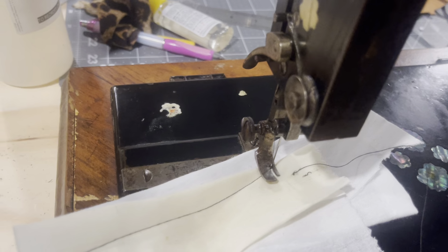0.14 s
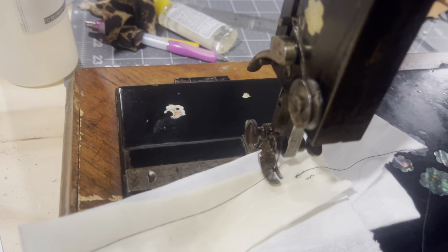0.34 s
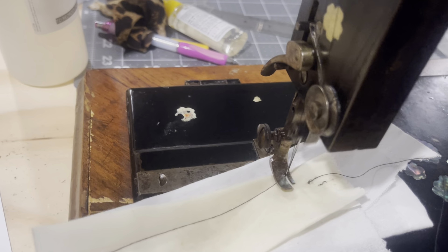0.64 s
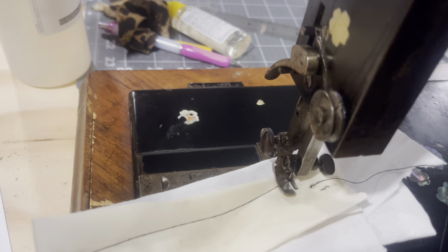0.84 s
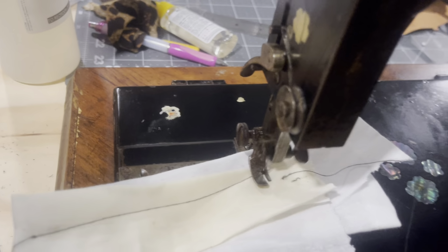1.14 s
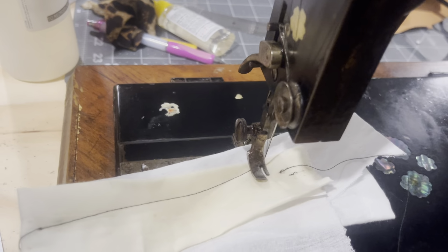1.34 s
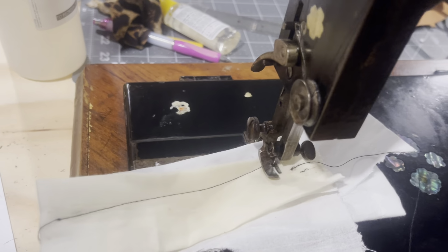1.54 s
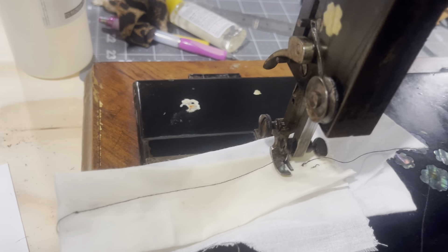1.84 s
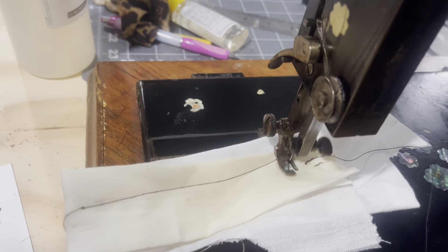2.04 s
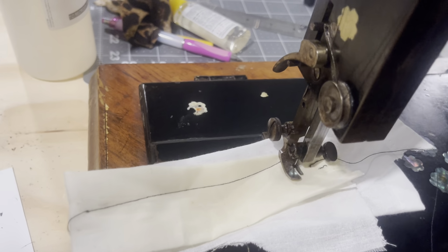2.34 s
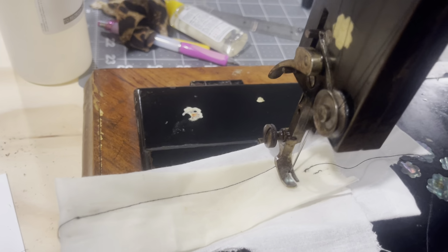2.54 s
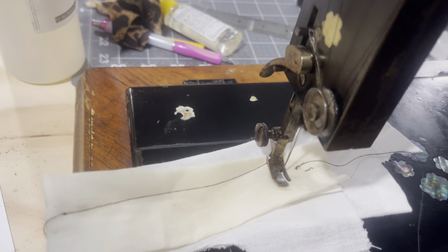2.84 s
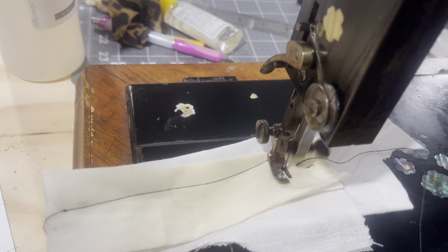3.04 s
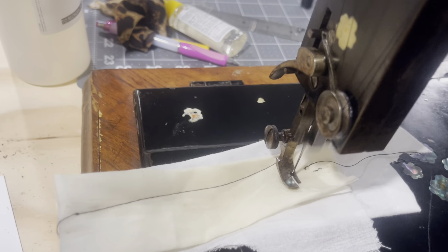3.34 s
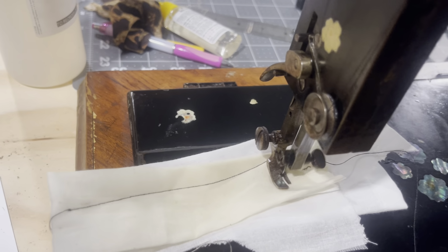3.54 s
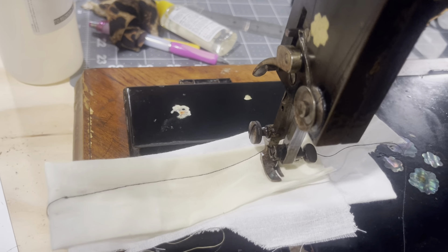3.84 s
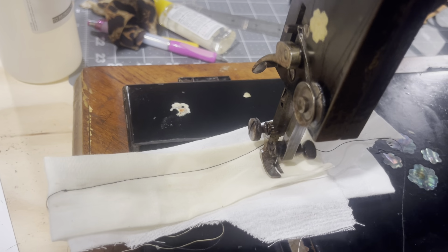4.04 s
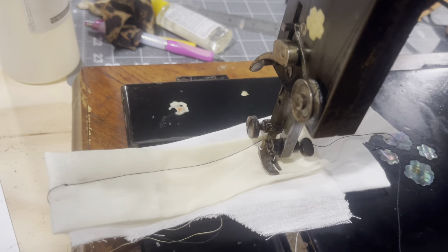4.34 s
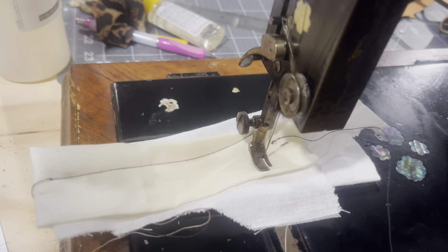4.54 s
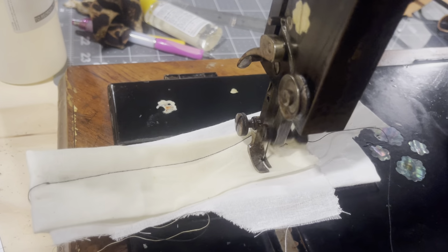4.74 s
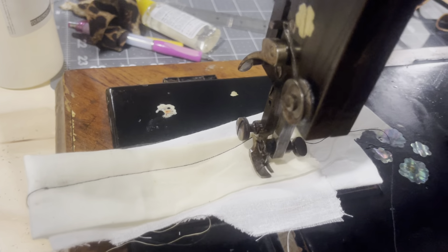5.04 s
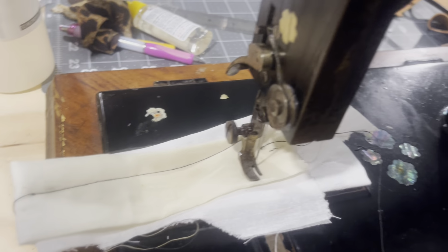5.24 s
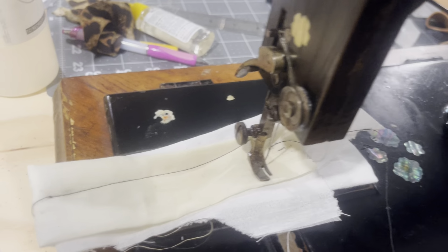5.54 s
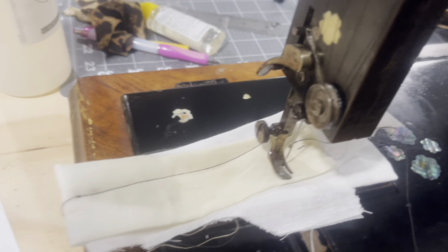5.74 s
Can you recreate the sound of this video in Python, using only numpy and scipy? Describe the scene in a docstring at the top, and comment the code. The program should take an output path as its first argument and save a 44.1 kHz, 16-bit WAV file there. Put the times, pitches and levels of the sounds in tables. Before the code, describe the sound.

Close stereo pickup indoors, with little echo. Hands knock a wooden cabinet, loose steel jangles briefly, and a vintage sewing machine starts a bit unevenly. It settles into fast, regular clicking and clacking over a woody rumble, with slight thread hiss and a faint wheel moan coming and going. After about five seconds it slows, knocks once clearly, and leaves a quiet room hum.

```python
"""In a small room, close by, an old cast-iron sewing machine on a wooden cabinet sews sixteen stitches.
Noise-like knocks and ringing modes hit the cabinet, then the drive rumbles up as streams of tiny contacts.
In every turn the needle goes down, the shuttle and thread snap against steel, loose joints tap,
the feed clacks and a spring ticks: short bursts of coloured noise or brief damped tones.
The wheel moans where it rubs, then runs out over a quiet room hum of noise and faint tones."""
import sys
import numpy as np
from scipy import signal
from scipy.fft import rfft, irfft, next_fast_len
from scipy.io import wavfile
from scipy.ndimage import uniform_filter1d, map_coordinates

SR = 44100
rng = np.random.default_rng(int(sys.argv[2]) if len(sys.argv) > 2 else 0)


def file_out(sig):
    """Save sig as 16-bit WAV at sys.argv[1]."""
    # one column per channel
    cols = np.atleast_2d(sig).T
    # limit, then scale
    lim = np.clip(cols, -1, 1)
    pcm = np.round(lim * 32767).astype(np.int16)
    wavfile.write(sys.argv[1], SR, pcm)


N = 259749  # length of the scene in samples


def amp(db):
    """Turn decibels into a plain multiplier."""
    return 10 ** (np.asarray(db) / 20)


def unit(x):
    """Scale a sound to an rms of 1."""
    return x / np.sqrt(np.mean(x ** 2) + 1e-20)


def along(points, hz):
    """Read a curve of (frequency, value) points on a log frequency axis."""
    f, v = np.transpose(points)
    return np.interp(np.log(hz + 1), np.log(f + 1), v)


def clock(length=N):
    """Seconds, sample by sample."""
    return np.arange(length) / SR


def wobble(rate):
    """A smooth random curve through `rate` random points a second."""
    return map_coordinates(rng.standard_normal(N // 20), [clock() * rate], mode="wrap")


def filtered(x, response):
    """Filter x by a response given as a function of frequency."""
    m = next_fast_len(x.shape[-1] + SR // 4)
    spectrum = rfft(x, m) * response(np.fft.rfftfreq(m, 1 / SR))
    return irfft(spectrum, m)[..., :x.shape[-1]]


def coloured(x, colour):
    """Filter x by a table of levels over frequency."""
    return filtered(x, lambda hz: amp(along(colour, hz)))


def causal(colour, hz):
    """Minimum-phase response of a colour: it rings only after the blow."""
    cepstrum = irfft(np.log(amp(along(colour, hz))))
    half = len(cepstrum) // 2
    # fold the second half onto the first, so nothing comes before the blow
    return np.exp(rfft(np.r_[cepstrum[0], 2 * cepstrum[1:half], np.zeros(half)]))


# How alike the left and right sides are: pitch_hz, likeness (1 = the same)
LIKENESS = [(60, 1), (250, 0.81), (600, 0.92), (1200, 0.34), (2500, 0.54), (7000, 0.63), (12000, 0.78)]


def spread(pair):
    """Mix two unrelated signals into left and right, partly alike at each frequency."""
    def mid_and_side(hz):
        mix_angle = np.arccos(np.clip(along(LIKENESS, hz), -1, 1)) / 2
        return np.array([np.cos(mix_angle), np.sin(mix_angle)])

    mid, side = filtered(pair, mid_and_side)
    return np.array([mid + side, mid - side])


def rush(colour):
    """Two coloured noises that share an rms of 1."""
    return unit(coloured(rng.standard_normal((2, N)), colour))


def steadied(x, span):
    """Even out the strength over span seconds, as a flywheel does for the drive."""
    power = uniform_filter1d(x[0] ** 2, max(int(span * SR), 1))
    return unit(x / np.sqrt(np.abs(power) + np.mean(power) / 20))


def add(track, s, sound):
    """Lay a sound into a track at s seconds."""
    part = track[..., max(round(s * SR), 0):][..., :sound.shape[-1]]
    part += sound[..., :part.shape[-1]]


def chatter(rate, bed, t60, count=4):
    """Tiny contacts of uneven size in several parts, each briefly ringing, on a bed of rolling noise."""
    t = clock(SR // 20)
    parts = rng.standard_normal((count, 2, len(t))) * amp(-60 * t / t60)
    contacts = (rng.random((count, 1, N)) < rate / count / SR) * rng.standard_normal(N)
    rung = signal.oaconvolve(contacts, parts, axes=-1).sum(axis=0)[:, :N]
    return unit(rung) + bed * rng.standard_normal((2, N))


def strikes(events, colour, t60, ring_db, ring_t60):
    """Each contact is a short burst in a part's crowded resonances, with a weaker, longer ring."""
    t, track = clock(SR // 5), np.zeros((2, N))
    decay = amp(-60 * t / t60) + amp(ring_db - 60 * t / ring_t60)
    shape = decay * (1 - np.exp(-t / 0.00021))  # soft onset
    size = 16384
    hz = np.fft.rfftfreq(size, 1 / SR)
    for s, db in events:
        # no two contacts land on quite the same spot, so each has its own colour
        tint = [(f, level + rng.normal(0, 2)) for f, level in colour]
        noise = rng.standard_normal((2, len(t))) * shape
        burst = irfft(rfft(noise, size) * causal(tint, hz))
        burst = burst / np.linalg.norm(burst, axis=1, keepdims=True)
        add(track, s, amp(db) * burst)
    return track


def ring(modes, attack):
    """Damped modes after one blow, at slightly new strengths."""
    t, tones = clock(SR // 2), 0
    for hz, db, t60 in modes:
        tones = tones + amp(db + rng.normal() - 60 * t / t60) * np.sin(2 * np.pi * hz * t)
    return tones * (1 - np.exp(-t / attack))


# The room's quiet air noise: pitch_hz, level_db (relative)
AIR_COLOUR = [(15, -34), (25, -15.5), (114, 0), (600, -11.5), (1200, -18.5), (2110, -28.5), (3340, -20),
              (4370, -32), (4740, -26.5), (9320, -30.5), (16000, -56.5)]
# Faint electrical tones: pitch_hz, level_db (rms)
HUM_TONES = [(3359, -90), (4705, -92), (9410, -107)]


def background():
    """Room air, a low drone of changing strength, a thin hiss and faint electrical tones."""
    tones = 0
    for hz, db in HUM_TONES:
        phase = 2 * np.pi * hz * clock() + 0.12 * wobble(21)
        tones = tones + amp(db) * np.sqrt(2) * np.sin(phase)
    drone_s = [0, .25, .4, .6, 5.1, 5.45, 5.56, 5.75]
    drone_db = [-88.5, -50, -68.5, -56.0, -55.5, -67.5, -72, -64.0]
    drone_colour = [(20, -40), (45, -16), (60, 5.5), (74, -11.5), (110, -1.0), (300, -127)]
    drone = amp(np.interp(clock(), drone_s, drone_db)) * steadied(rush(drone_colour), span=0.14)
    hiss_colour = [(2500, -35), (3100, -12), (3380, 5.0), (3700, 1.0),
                   (4300, -19), (4700, -4), (5200, -4), (9000, -48)]
    hiss = amp(-88.5) * rush(hiss_colour)
    return tones + spread(amp(-75) * rush(AIR_COLOUR) + drone + hiss)


# How long the room echoes: pitch_hz, fall_by_60_db_s
ROOM_DECAY = [(150, 0.36), (1500, 0.21), (6000, 0.2), (14000, 0.15)]


def room(x):
    """A small room's answer, each frequency dying at its own speed."""
    hz, t, z = signal.stft(rng.standard_normal((2, SR // 2)), SR, nperseg=256)
    fading = z * amp(-60 * t / along(ROOM_DECAY, hz)[:, None])
    tail = signal.istft(fading, SR, nperseg=256)[1]
    # the answer begins 5 ms late
    tail = np.pad(tail / np.linalg.norm(tail[0]), ((0, 0), (SR // 200, 0)))
    return signal.fftconvolve(x, tail, axes=1)[:, :N]


# Level difference at the two microphone ports: pitch_hz, left_minus_right_db
PORT_TILT = [(150, 2), (400, -2.5), (550, -6), (720, 9.5), (1100, -1), (3900, -2), (5200, 4.5),
             (6100, -0.5), (7100, 1), (8400, -5), (9600, -0.5)]
# Phase difference at the ports: pitch_hz, left_lead_rad
PORT_LEAD = [(0, 0), (600, 0.1), (950, -1.4), (2930, 1.0), (4390, 0.8), (5000, 2.7), (5510, 0.8),
             (6370, 0.3), (6980, 1.4), (8180, 7.2), (11600, 0.4), (12500, -0.4), (13400, -3.2),
             (14000, -3.1), (14900, -6.0), (16400, -6.3)]


def ports(hz):
    """Reflections favour one microphone port or the other, by frequency."""
    level = amp(np.outer([.5, -.5], along(PORT_TILT, hz)))
    return level * np.exp(1j * np.outer([.5, -.5], along(PORT_LEAD, hz)))


# One row a stitch: needle_down_s, needle_db, main_snap_delay_s, early_snap_db, main_snap_db,
# late_snap_db, thump_db, rod_swing_db (levels relative within each kind of sound)
STITCH_ROWS = [(0.597, -34, 0.017, -51, -29.5, -36, -40, -45.5),
               (0.9716, -31, 0.012, -51, -57, -24, -39, -47),
               (1.2912, -35, .016, -74, -30.5, -30.5, -48, -44),
               (1.5831, -29.5, 0.013, -43.5, -26.5, -38, -42.5, -40.5),
               (1.875, -29, 0.011, -36, -28, -49, -44.5, -38.5),
               (2.167, -29, .0175, -68, -38.5, -48, -44.5, -36),
               (2.4536, -29, 0.014, -31.5, -33, -31.5, -43.5, -43),
               (2.7552, -32, 0.014, -45, -30.5, -26.5, -47, -42),
               (3.0519, -31.5, 0.016, -49, -31, -37.5, -43, -35.5),
               (3.3244, -30.5, .0155, -50, -44, -33, -37.5, -35.5),
               (3.6068, -29, .0128, -41, -24.5, -33, -44, -38),
               (3.883, -29.5, 0.014, -46, -29, -31, -44, -34.5),
               (4.158, -34, 0.017, -41.5, -29.5, -34.5, -39.5, -46),
               (4.4614, -33.5, 0.014, -64, -58, -24.5, -43, -38.5),
               (4.749, -33, 0.014, -34, -29, -31, -40.5, -41.5),
               (5.081, -34, .009, -70, -27, -48, -45.5, -52)]
# ends of the turn count, set before the drive is heard and after it dies away
COUNT_FROM_S, COUNT_TO_S = .2, 5.7


def marks():
    """Times of the whole turns, one at each needle stroke, with the two ends of the turn count."""
    return np.r_[COUNT_FROM_S, np.transpose(STITCH_ROWS)[0], COUNT_TO_S]


def angle():
    """The turn count over time: the needle goes down at whole turns."""
    return np.interp(clock(), marks(), np.arange(len(marks())))


def each_turn(share):
    """For every stitch, the time at which the shaft stands a share of a turn past the needle."""
    return np.interp(np.arange(len(STITCH_ROWS)) + 1 + share, np.arange(len(marks())), marks())


# Levels within one turn: share_of_turn after the needle, rumble_db, bearing_rattle_db, thread_hiss_db
# (levels relative)
TURN_LEVELS = [(0, 5, -0.5, -50), (0.038, 4, 2.5, -44.5), (.15, 5.5, 1.5, -57), (.25, 0.5, 2, -63.5),
               (0.418, 2.5, 3, -60.5), (.52, -4.5, -8, -69.5), (.63, -1.5, -2, -69), (.75, 4, 0, -75.5),
               (.82, 3, 7, -60.5), (.9, 2, 3, -56.5), (0.978, 6, 1.5, -63.5)]


def turn():
    """Rumble, rattle and hiss levels as the shaft goes round."""
    share, *levels = np.transpose(TURN_LEVELS)
    return [np.interp(angle(), share, db, period=1) for db in levels]


WHEEL_TURN_S, WHEEL_BINDS_S = .855, 1.47  # about one round in three stitches; a time when it binds


def wheel_swell():
    """+1 where the drive wheel binds, once a round, and -1 where it runs free."""
    return np.cos(2 * np.pi * (clock() - WHEEL_BINDS_S) / WHEEL_TURN_S)


# The drive starts, falters once, runs steadily and runs out: time_s, level_db (before the wheel's swell)
DRIVE_LEVEL = [(0.4, -56.5), (0.48, -53.5), (0.6, -45.5), (0.78, -49.5), (0.96, -42.5), (2.3, -41.5),
               (3.3, -41), (4.45, -42), (4.92, -42), (5.2, -53.5), (5.29, -64), (5.5, -73)]


def effort():
    """The drive's level in dB, swelling by 1 dB with each turn of the wheel; near silent outside the table."""
    return np.interp(clock(), *np.transpose(DRIVE_LEVEL), left=-120, right=-120) + wheel_swell()


def fade_with_drive():
    """A multiplier that fades a sound out when the drive is weak."""
    return amp(np.minimum(effort() + 46, 0))


# Knocks on the cabinet: time_s, boom_db, panel_db, steel_ring_db (levels relative)
KNOCK_ROWS = [(0.052, -68, -55.5, -80), (0.106, -60, -35.5, -45.5), (0.116, -65, -37.5, -70),
              (0.162, -46.5, -51, -68), (0.185, -41, -43, -64), (0.24, -59, -57, -86),
              (0.272, -55.5, -56, -79), (0.439, -54, -44, -82), (5.133, -51, -31.5, -52),
              (5.228, -52.5, -41, -85), (5.398, -54.5, -51, -92), (5.688, -62.5, -57.5, -91),
              (5.781, -63.5, -58, -93)]
# Tones of the cabinet's box: pitch_hz, level_db (relative), fall_by_60_db_s
BOX_MODES = [(71.4, -5, 0.62), (136, 5.5, 0.073), (156.4, 3, 0.075)]
# Tones of its panel: pitch_hz, level_db (relative), fall_by_60_db_s
PANEL_MODES = [(268, -4, 0.087), (366, -8, 0.095), (420, 4.5, 0.043), (630, -9.5, 0.034)]
# Colour of loose steel: pitch_hz, level_db (relative)
STEEL_COLOUR = [(600, -7), (1350, -7), (1800, 0), (2100, 1), (2450, -18), (3100, -13.5), (6400, -19),
                (11000, -60)]


def knocks():
    """Hands and the wheel knock the cabinet: its box booms, a panel rings and loose steel jangles."""
    track = np.zeros(N)
    for s, boom_db, panel_db, _ in KNOCK_ROWS:
        boom = amp(boom_db) * ring(BOX_MODES, attack=0.0034)
        panel = amp(panel_db) * ring(PANEL_MODES, attack=0.0044)
        add(track, s, boom + panel)
    steel_hits = np.array(KNOCK_ROWS)[:, [0, -1]]
    steel = strikes(steel_hits, STEEL_COLOUR, t60=0.014, ring_db=-18, ring_t60=0.23)
    return track + amp(21) * spread(steel)


# Wood resonances of the cabinet: pitch_hz, width_hz, level_db (relative)
CABINET_MODES = [(85.2, 18, -9), (120.3, 28.7, -4.5), (164.6, 23, -2.5)]


def wood(hz):
    """The cabinet answers most strongly at a few resonances, in alternating sign."""
    response = 0
    for k, (centre, width, db) in enumerate(CABINET_MODES):
        damping = 1j * hz * width
        response = response + (-1) ** k * amp(db) * damping / (centre ** 2 - hz ** 2 + damping)
    return response


# Colour of the rumble: pitch_hz, level_db (relative)
RUMBLE_COLOUR = [(50, -76), (130, -16), (215, -4.5), (270, -1.5), (350, 1.5), (430, 1.5), (520, -6.5),
                 (610, -12.5), (790, -19), (1100, -37), (5000, -110)]
# Colour of the bearing rattle: pitch_hz, level_db (relative)
RATTLE_COLOUR = [(300, -31), (850, -5.5), (1040, 11), (1120, 3), (1220, 6), (1500, 2.5), (1900, -6),
                 (2200, -6.5), (2550, -24), (3000, -12), (6500, -25.5), (13000, -74)]


def drive():
    """Wheels and rods shake the cabinet; loose bearings rattle above."""
    rumble_db, rattle_db, _ = turn()
    body = steadied(filtered(chatter(rate=170, bed=0.99, t60=0.0016), wood), span=0.098)
    rumble = steadied(coloured(chatter(rate=70, bed=1.0, t60=0.053), RUMBLE_COLOUR), span=0.0547)
    rattle = coloured(chatter(rate=90, bed=0.75, t60=.014), RATTLE_COLOUR)
    rattle = unit(rattle * amp(1.8 * wobble(100)))  # uneven strength
    mix = amp(-7.0) * body + amp(rumble_db - 3.5) * rumble + amp(rattle_db - 15.0) * rattle
    return amp(effort()) * mix


def moan():
    """The wheel rubs about every third stitch; its note sways once with each turn of the shaft."""
    pitch_hz = 675 + 45 * np.cos(2 * np.pi * (angle() - .28))
    rough = wobble(60) + 1j * wobble(60)
    tone = np.real(rough * np.exp(2j * np.pi * np.cumsum(pitch_hz) / SR))
    return amp(effort() - 20 + 4 * wheel_swell()) * tone


def thumps():
    """Time and level of the shuttle's return in each stitch."""
    return list(zip(each_turn(-.205), np.transpose(STITCH_ROWS)[-2]))


# The rods reverse twice a turn: share_of_turn after the needle, level_db over the rod swing
ROD_REVERSALS = [(-.06, -1.5), (0.459, -3)]
ROD_HZ, THUMP_HZ = 172, 126.5  # middle pitches, before the scatter
SWELL_S, NOTE_SCATTER = 0.033, 0.027  # swell width; pitch scatter as a share


def booms():
    """The cabinet swells and sinks on a low note at each rod reversal and each return of the shuttle."""
    swing_db = np.transpose(STITCH_ROWS)[-1]
    notes = [(s, THUMP_HZ, db) for s, db in thumps()]
    for share, db in ROD_REVERSALS:
        notes += [(s, ROD_HZ, level + db) for s, level in zip(each_turn(share), swing_db)]
    track, t = np.zeros(N), clock(SR // 4) - 1 / 8  # the swell peaks at t = 0
    for s, hz, db in notes:
        pitch = hz * (1 + NOTE_SCATTER * rng.normal())
        tone = np.sin(2 * np.pi * (pitch * t + rng.random()))
        add(track, s - 1 / 8, amp(db + 1.5) * np.exp(-(t / SWELL_S) ** 2) * tone)
    return track * fade_with_drive()


# Colour of cloth and thread: pitch_hz, level_db (relative)
CLOTH_COLOUR = [(1200, -12), (2600, 1), (3300, -0.5), (4100, 4), (4800, 4.5), (6600, 2.5), (8000, -5),
                (10000, -22), (13000, -46), (15300, -30), (16500, -45)]


def thread():
    """Thread and cloth hiss in small catches, loudest just after the needle enters."""
    catches = coloured(chatter(rate=100, bed=1.5, t60=.008), CLOTH_COLOUR)
    return fade_with_drive() * amp(turn()[2] - 2.0) * unit(catches * amp(4.5 * wobble(240)))


# soft click and tap as the wheel slows to a stop (levels relative)
RUNOUT_S, RUNOUT_SNAP_DB, RUNOUT_TAP_DB = 5.217, -54.5, -39
# Where the linkage has play: share_of_turn after the needle, level_db over the drive
PLAY_PLACES = [(-.31, -2.5), (-.2, -6.5), (-.09, -4.5), (.18, 6), (.33, -1.5)]
PLAY_SCATTER_S, PLAY_SCATTER_DB = .006, 3  # no two turns tap quite alike
TAP_HZ, TAP_PITCH_SCATTER = 1240, .13  # middle pitch; scatter in log pitch
TAP_PAIR_RATIO, TAP_T60_S = 1.19, .024  # upper over lower pitch; ring time of the lower


def driven(share, db):
    """One contact a turn (time and level), as hard as the drive is working."""
    times = each_turn(share)
    return list(zip(times, db + np.interp(times, clock(), effort())))


def linkage():
    """Loose joints tap at about the same places in each turn, harder the harder the drive works."""
    taps = [(RUNOUT_S, RUNOUT_TAP_DB)]
    for share, level in PLAY_PLACES:
        for s, db in driven(share, level):
            shift_s = PLAY_SCATTER_S * rng.normal()
            taps.append((s + shift_s, db + PLAY_SCATTER_DB * rng.uniform(-1.1, 1)))
    track = np.zeros(N)
    for s, db in taps:
        # each tap rings on a pitch of its own, in a close pair of modes
        hz = TAP_HZ * np.exp(TAP_PITCH_SCATTER * rng.normal())
        pair = [(hz, 0, TAP_T60_S), (hz * TAP_PAIR_RATIO, -4, TAP_T60_S / 2)]
        add(track, s, amp(db - 2) * ring(pair, attack=.0012))
    return track


def clunks():
    """Just before each thump the rod takes up its slack with a wooden clunk."""
    slack = [(s - .014, db) for s, db in thumps()]
    return amp(22) * strikes(slack, RUMBLE_COLOUR, t60=0.04, ring_db=-13.0, ring_t60=0.069)


# The feed pulls the cloth on, a little under half a turn after the needle: time_s, level_db (relative)
FEED_STROKES = [(0.7581, -32.5), (1.1081, -33), (1.4171, -36), (1.701, -32), (1.998, -35), (2.2862, -36.5),
                (2.5757, -34), (2.8832, -31.5), (3.1679, -34), (3.44, -34.5), (3.7238, -36), (3.9972, -34),
                (4.282, -34), (4.587, -34), (4.8685, -34)]
# Colour of the feed's clack: pitch_hz, level_db (relative)
CLACK_COLOUR = [(400, 5), (900, -6.5), (1250, 3), (1600, -1), (1900, -8), (2200, -2.5), (2520, -20),
                (2950, -3.5), (3900, -18.5), (6000, -11.5), (8500, -16.5), (10300, -29), (12200, -37),
                (16000, -48.5)]


def feed():
    """The feed clacks; its teeth click with the clack and again 8 ms later as they settle."""
    clacks = amp(21) * strikes(FEED_STROKES, CLACK_COLOUR, t60=0.027, ring_db=-14, ring_t60=0.061)
    teeth = [(s + lag, db + rng.normal(0, 3.6)) for s, db in FEED_STROKES for lag in (0, .008)]
    teeth_colour = [(1500, -13), (3500, -23), (5000, -22), (6700, 3.5),
                    (8800, 8.5), (11000, -15), (15000, -32)]
    clicks = amp(0.5) * strikes(teeth, teeth_colour, t60=0.0056, ring_db=-25, ring_t60=0.12)
    return clacks + clicks


def spring():
    """A small spring ticks three times near the start and after each feed stroke."""
    starts = [.452] + [s + .036 + rng.normal(0, .002) for s, _ in FEED_STROKES]
    ticks = []
    for s in starts:
        for k in range(3):
            ticks.append((s + k * .012 + rng.normal(0, .001), -38 - k + rng.normal(0, 1.5)))
    colour = [(2000, -46.5), (5400, -9.5), (5850, 9.5), (6150, 5), (6500, -13), (8500, -13), (12000, -52)]
    return amp(1.5) * strikes(ticks, colour, t60=.015, ring_db=-26, ring_t60=0.045)


# The early, main and late snap, counted from the main one: step_s
SNAP_STEPS = [-.037, 0, .0177]
# Colour of the snaps: pitch_hz, level_db (relative)
STEEL_SNAP_COLOUR = [(600, -34), (2100, -9), (2550, -25.5), (3300, -5.5), (4050, 4.5), (4750, -4),
                     (5500, -1.5), (6450, 3.5), (7500, 0), (8600, -11.5), (10000, -20), (13000, -40),
                     (15400, -23), (16800, -44)]


def snaps():
    """Shuttle and thread snap against steel three times a stitch, and once as the wheel runs out."""
    events = [(RUNOUT_S, RUNOUT_SNAP_DB)]
    for s, _, delay, *levels, _, _ in STITCH_ROWS:
        events += [(s + delay + step, db) for step, db in zip(SNAP_STEPS, levels)]
    return amp(17) * strikes(events, STEEL_SNAP_COLOUR, t60=.011, ring_db=-13, ring_t60=0.037)


# Colour of the needle stroke: pitch_hz, level_db (relative)
NEEDLE_STROKE_COLOUR = [(400, -49), (1200, 4.5), (2000, -8.5), (2550, -31), (4100, -1.5), (5200, -21),
                        (6900, 1), (9800, -2), (10600, -5), (11400, -6.5), (12000, -1.5), (13600, -18.5),
                        (15600, -32), (16800, -47)]


def needle():
    """The needle goes down once a stitch with a short bright burst."""
    strokes = [row[:2] for row in STITCH_ROWS]
    return amp(15) * strikes(strokes, NEEDLE_STROKE_COLOUR, t60=0.02, ring_db=-34, ring_t60=0.047)


def scene():
    """The machine with the room's answer to its hits, over the quiet background."""
    stitches = needle() + snaps() + feed() + clunks()
    hits = spread(stitches + linkage() + spring()) + knocks()
    machine = hits + amp(-14.5) * room(hits) + booms() + moan() + spread(drive() + thread())
    return filtered(machine, ports) + background()


def record(dry):
    """Keep nothing above the band limit of 16600 Hz."""
    return filtered(dry, lambda hz: hz < 16600)


dry = scene()
out = record(dry)
file_out(out)
```